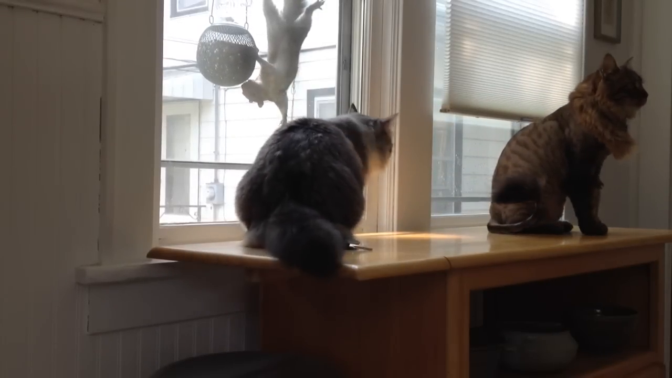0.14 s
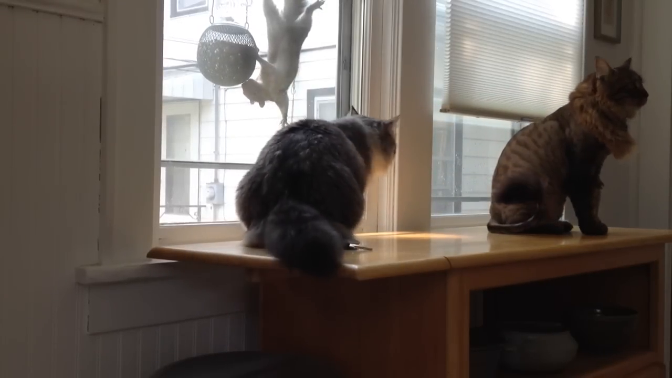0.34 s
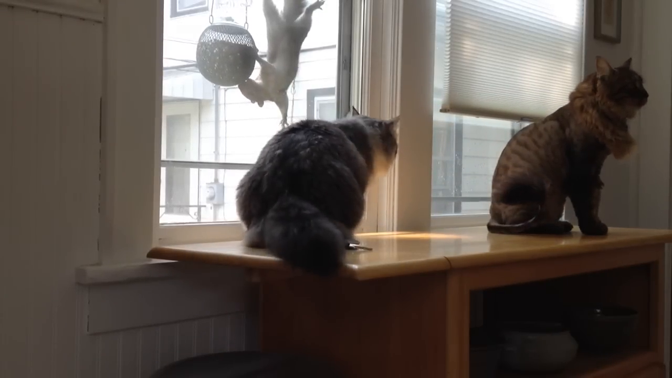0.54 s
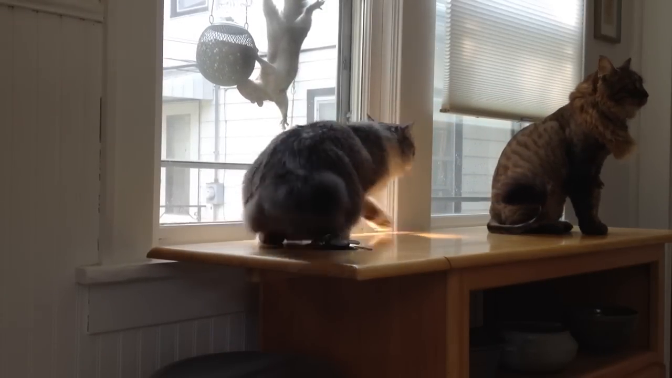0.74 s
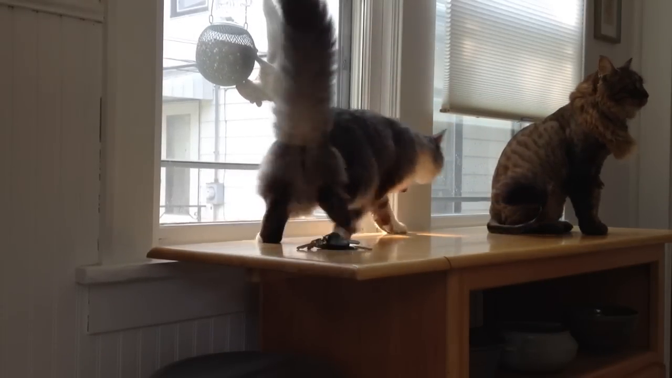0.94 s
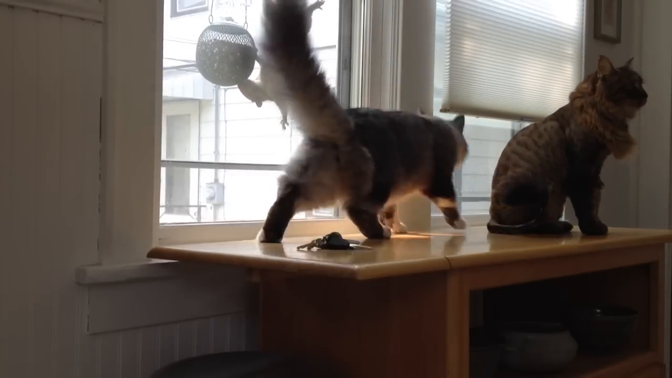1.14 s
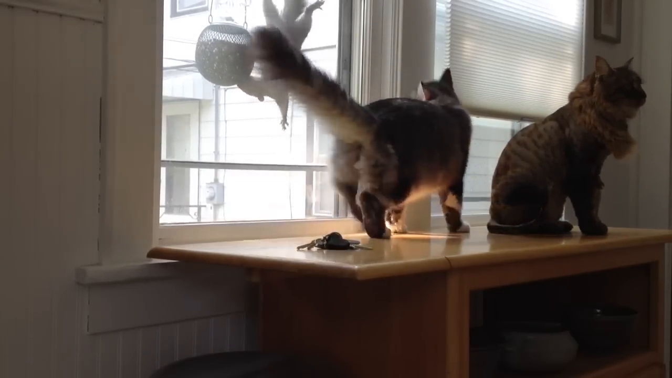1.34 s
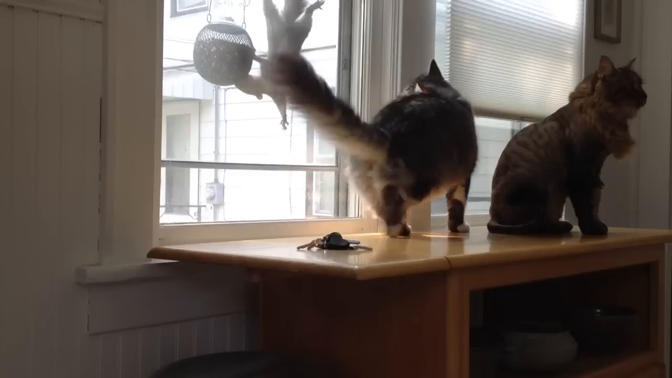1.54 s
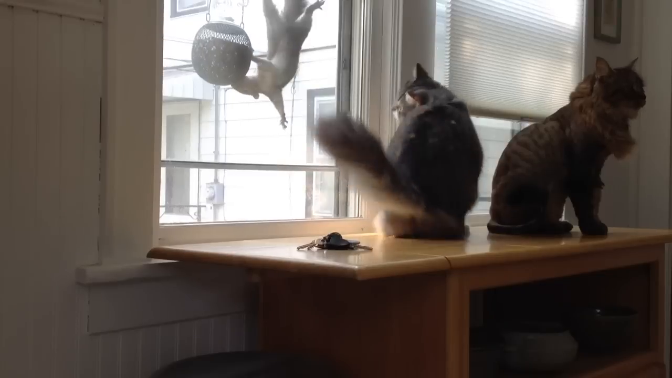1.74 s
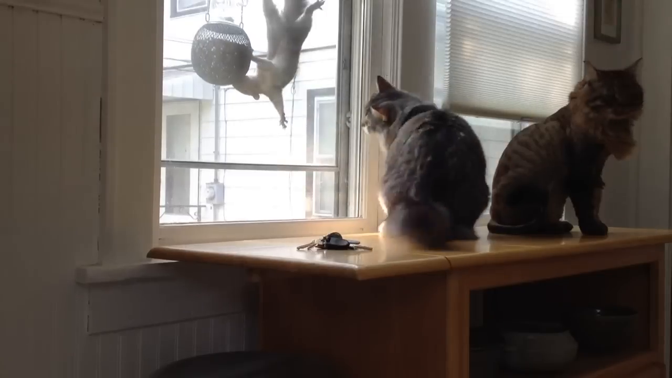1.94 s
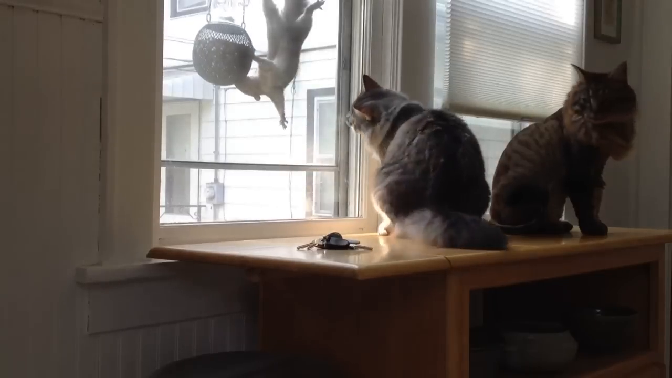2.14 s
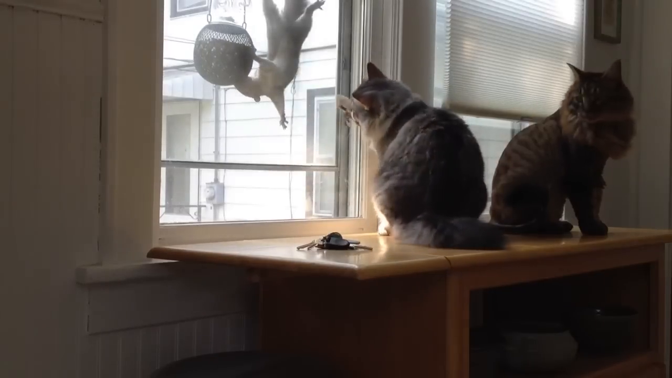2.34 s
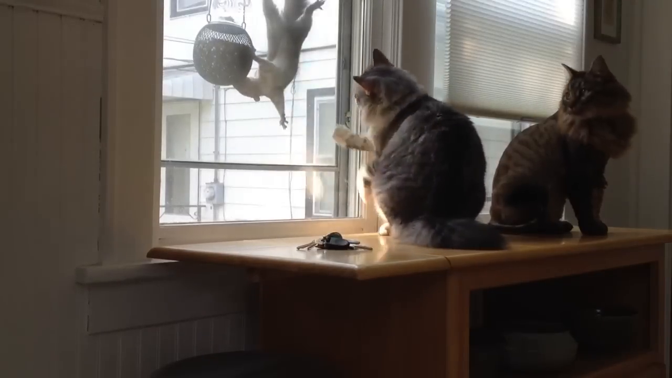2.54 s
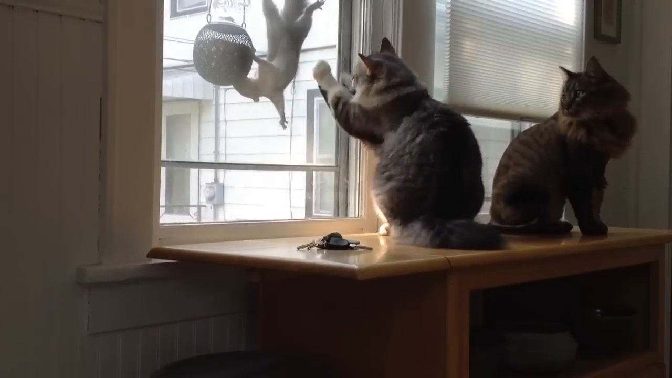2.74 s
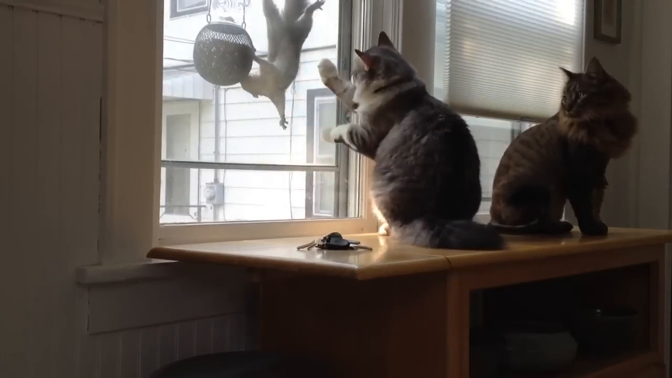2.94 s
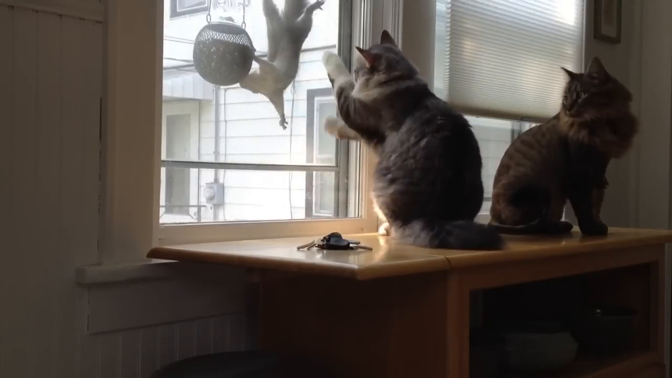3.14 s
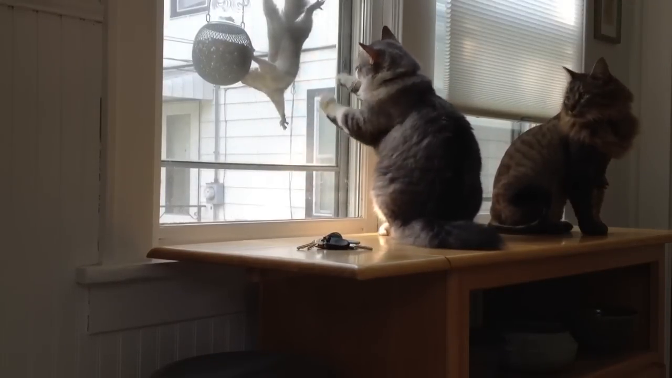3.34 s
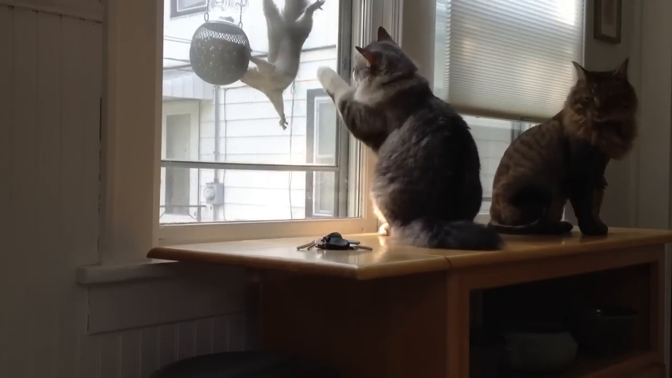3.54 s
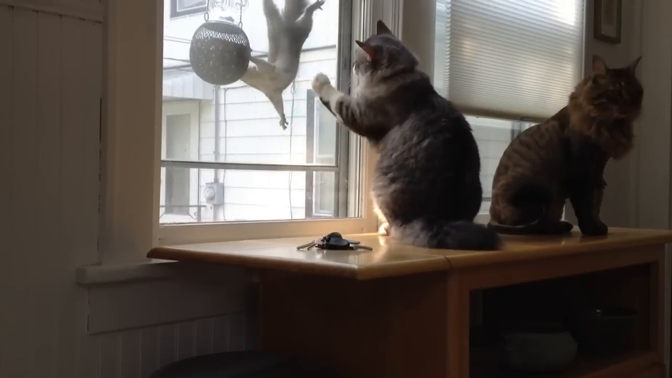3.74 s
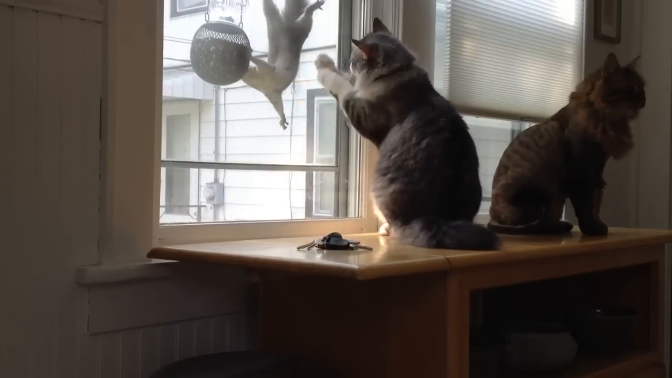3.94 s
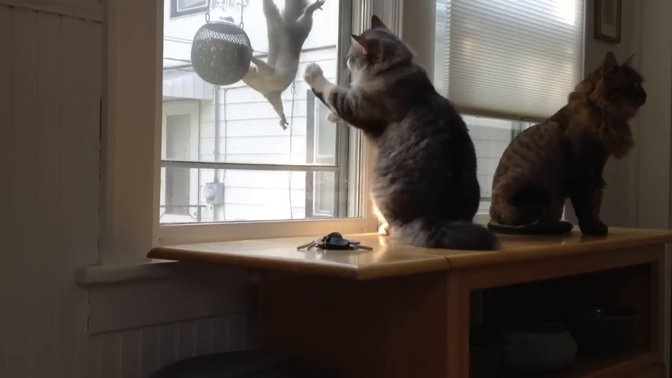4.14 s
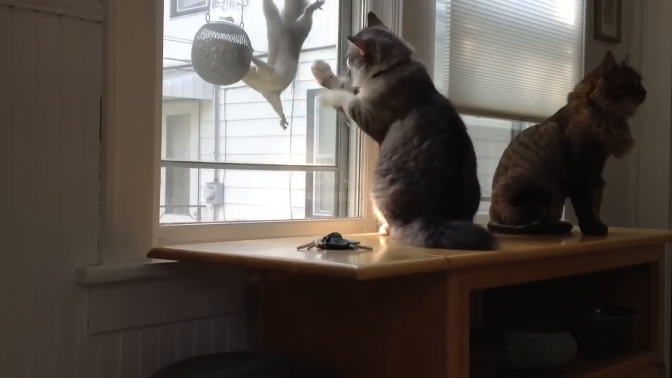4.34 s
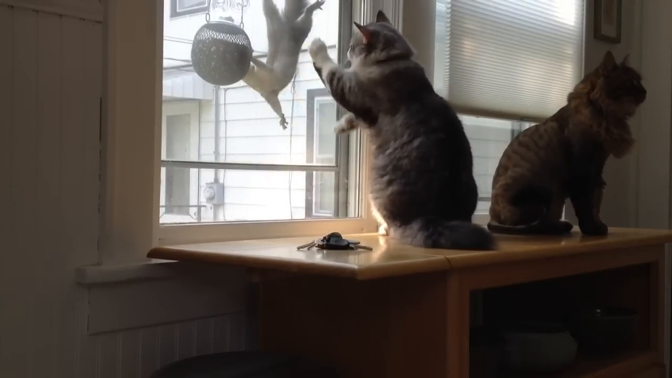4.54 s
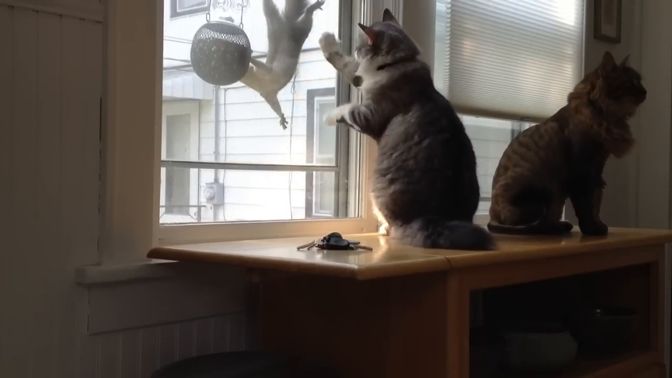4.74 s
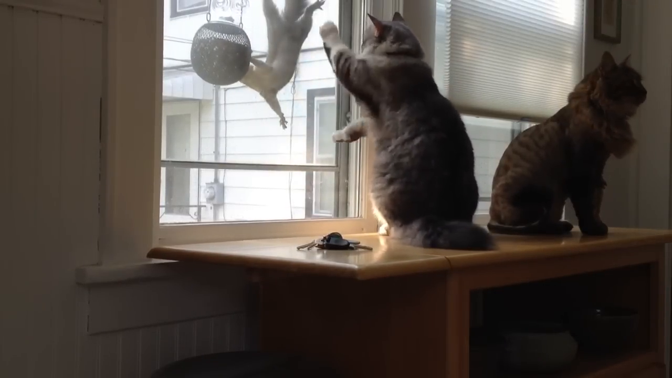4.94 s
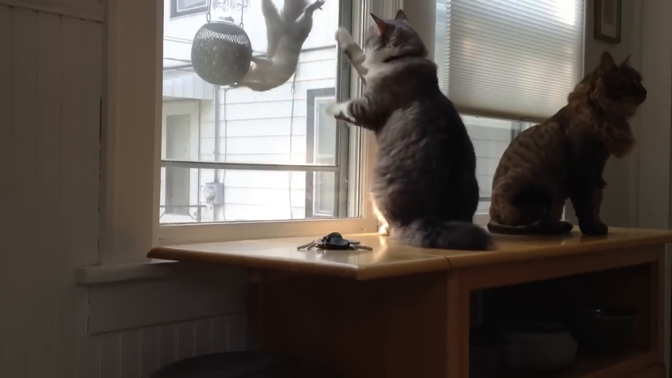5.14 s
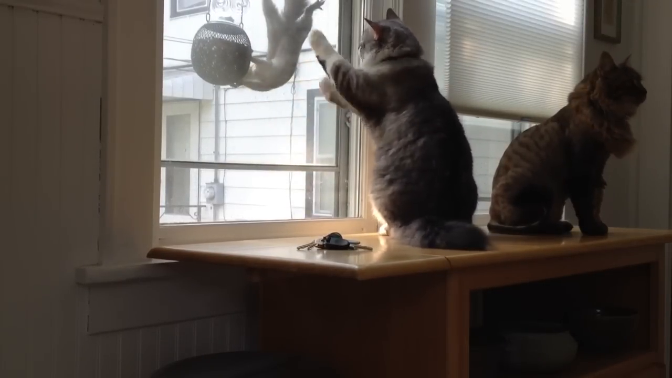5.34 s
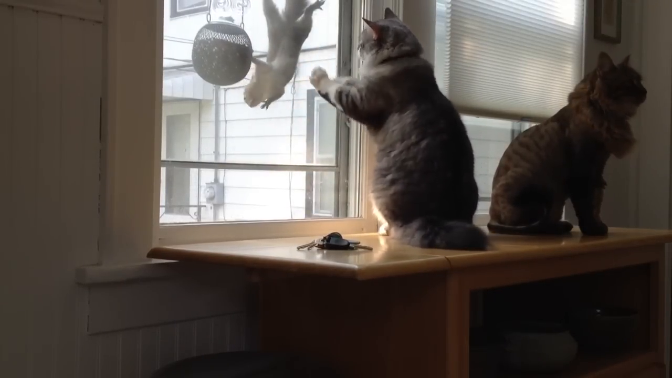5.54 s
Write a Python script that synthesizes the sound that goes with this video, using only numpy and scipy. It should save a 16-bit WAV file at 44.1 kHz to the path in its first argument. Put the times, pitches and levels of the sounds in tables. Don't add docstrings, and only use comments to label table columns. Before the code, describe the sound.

Low fridge hum in a small hard room, faint fur rustles, then irregular bright claw ticks and dull pats on a loose window.

```python
import sys
import numpy as np
from scipy import signal
from scipy.fft import rfft, irfft, next_fast_len
from scipy.io import wavfile
from scipy.ndimage import uniform_filter1d

SR = 44100
rng = np.random.default_rng(int(sys.argv[2]) if len(sys.argv) > 2 else 0)


def gain_from_decibels(decibels):
    exponent = np.asarray(decibels, float) / 20
    return 10 ** exponent


def inscribe(sig):
    pcm = np.round(np.clip(np.atleast_2d(sig).T, -1, 1) * 32767)
    wavfile.write(sys.argv[1], SR, pcm.astype(np.int16))


N = 246959
TIME = np.arange(N) / SR

# start in seconds, force in dB, edge burst in Hz,
# flatness in dB (a flat claw rings the pane more, ticks less), room share in dB.
CLAW_STRIKES = [(2.7585, -17, 6840, -1.5, 1), (3.2245, -23, 6700, -0.5, 7), (3.2292, -22.5, 7650, 0.5, 2.5),
                (3.473, -24.5, 7430, -10, 4.5), (3.4759, -26.5, 6850, 0, 6.5), (3.6653, -30, 6500, -1, 8),
                (3.929, -20, 6940, -0.5, 2.3), (3.9322, -27.5, 6950, 5, 5.5), (4.0799, -31, 6700, 4.5, 7.5),
                (4.3266, -20, 7300, 2, 4.5), (4.331, -26, 6400, 7, -10), (4.5275, -18.5, 7400, 0, 0.5),
                (4.5282, -17.5, 7150, -6.5, 5), (4.5336, -27.5, 6750, 0, 3.5),
                (4.7623, -19, 6760, 1.5, 4.5), (4.77, -35, 6200, -2, -11), (4.9033, -34, 7030, 2, 7),
                (4.9649, -34.5, 6720, 7, 8), (4.9738, -31, 6660, 5, 5), (5.2258, -14.5, 7030, 1, -0.5),
                (5.2307, -29.5, 6900, 10, 7), (5.393, -25, 6850, -3, 8), (5.402, -23, 6700, -3, -5)]
# start in seconds, force in dB, tick sharpness in dB, edge burst in Hz.
CLAW_GRAZES = [(2.4035, -68, 3, 6130), (2.508, -46, -13, 7010), (2.5296, -41.5, -8, 6750),
               (2.753, -57, -13, 7100), (2.8205, -45, -7, 6630), (2.9145, -43, -11, 7170),
               (3.068, -57, -12, 6840), (3.109, -52, -12, 6700), (3.1582, -41, -5, 6700),
               (3.257, -44, 1, 6220), (3.3382, -43.5, -3, 7640), (3.6567, -39.5, -16, 6690),
               (4.083, -44, -9, 6900), (4.0906, -40, -15, 6750), (4.1323, -37, -16, 6800),
               (4.2473, -48.5, -13, 6670), (4.915, -44, -4, 7400), (4.9225, -44, -6, 7190),
               (4.9669, -35, -20, 7250), (4.9944, -56, -21, 7090), (5.009, -46, -20, 6660),
               (5.1795, -54, -3, 6100), (5.3958, -41, -17, 6700), (5.417, -38, -9, 6690)]
# delay after it in seconds, level in dB.
EDGE_ECHOES = [(.0017, -13), (.0033, -11), (.0050, -15), (.0062, -16)]
# frequency in Hz, level in dB.
SCATTER_BODY = [(700, -22), (1500, -24), (2100, -15), (2600, -7.5), (3100, -6.5), (3800, -0.5),
                (4200, -0.5), (4700, 1.5), (5150, -10), (6000, -38)]
SCATTER_LOW_EDGE = [(4800, -22), (5400, -4.5), (6000, -4.5), (6500, 0.5), (7200, -22.5)]
SCATTER_EDGE = [(6000, -15.5), (6800, -3), (7600, 2), (8400, -8.5), (9500, -18), (11500, -10),
                (13500, -12.5), (15500, -39)]
# start in seconds, knock in dB, boom in dB, rap in dB.
PAD_THUMPS = [(1.119, -51, -59, -74), (1.589, -52, -72, -71), (2.756, -36.5, -44.5, -57.5),
              (2.908, -67, -58, -61), (3.224, -34.5, -42.5, -48.5), (3.259, -39, -46.5, -56),
              (3.474, -38.5, -46, -57), (3.672, -53, -52.5, -63), (3.932, -41, -45.5, -53.5),
              (3.963, -56, -49, -68), (4.087, -38, -54, -51.5), (4.325, -48, -51, -58),
              (4.527, -40.5, -41, -43.5), (4.56, -43, -43, -54), (4.761, -45.5, -47.5, -63),
              (4.966, -50, -50, -51), (5.225, -48, -53.5, -63), (5.298, -64, -50, -64),
              (5.396, -52, -49, -58)]
# frequency in Hz, level in dB, T60 in seconds.
SASH_BOOM = [(126.4, 0.5, 0.18), (179.6, 2.5, 0.2), (206, 3, 0.068), (263, -4, 0.51), (340.8, 8.5, 0.23)]
SASH_KNOCK = [(392.5, 4, 0.11), (433.5, 4, 0.072), (491.3, 4, 0.059), (540, -17, 0.06), (608, -1.5, 0.047)]
SASH_RAP = [(643.5, 5, 0.1), (708, 2.5, 0.087), (788.6, 1, 0.094), (907, 5, 0.079), (946, -2.5, 0.14),
            (1092, 0, 0.049), (1202, -9.5, 0.064), (1372, -2.5, 0.056), (1510, 0, 0.041),
            (1830, -17, 0.038), (1995, -7, 0.09)]
# loudest moment in seconds, level in dB, swell in seconds,
# fade in seconds, brightness in dB; swell and fade span 20 dB.
FUR_SLIDES = [(.06, -73, .08, 0.12, -2), (.24, -63, 0.22, 0.42, 4), (.62, -67.5, 0.19, 0.63, 3.5),
              (1.07, -73.5, 0.061, 0.12, 2), (1.26, -79.5, 0.23, .24, -3), (1.4, -62, 0.02, 0.11, 1),
              (1.59, -65.5, 0.028, 0.11, -21), (2.22, -76, .05, .04, -2), (2.51, -76, 0.064, 0.048, -5),
              (2.532, -72, 0.012, 0.066, 4), (2.6, -76, .1, 0.12, -3)]
# frequency in Hz, level in dB.
FUR_BODY = [(2500, -12), (3400, -4), (4600, -4), (5150, -8.5), (5700, -6), (7500, -6.5), (9500, -16),
            (11000, -41)]
FUR_SHEEN = [(8500, -36), (10500, -3), (12000, 1), (15500, -5)]
FUR_SCUFF = [(900, -32), (1600, -6), (2500, 1), (3300, -7), (4200, -43)]
# band centre in Hz, level in dB, T60 in seconds.
ROOM_BANDS = [(282, 3, 0.27), (606, 6.5, 0.38), (1240, 4, 0.46), (2280, 6.5, 0.36), (3100, 4, 0.41),
              (4360, 3, 0.39), (5600, 7.5, 0.38), (7100, 0, 0.46), (8900, 7.5, 0.33), (10800, -1.5, 0.34),
              (14000, 1, 0.27)]
# frequency in Hz, level in dB.
ROOM_BASS = [(90, -12), (170, -0.5)]
# time in seconds, blade tone in Hz.
FAN_DRIFT = [(0.0, 176.38), (0.47, 176.19), (0.93, 176.52), (1.4, 176.48), (1.87, 176.78), (2.33, 176.64),
             (2.8, 176.46), (3.27, 176.12), (3.73, 176.48), (4.2, 176.46), (4.67, 176.59), (5.13, 176.72),
             (5.6, 176.68)]
SHAFT_ORDERS = [2, 8, 9, 10, 11, 12, 13, 14, 15, 20, 27, 32, 42]
# level in dB rms, one per order.
SHAFT_LEVELS_DB = [-100, -73, -75, -92, -73.5, -72.5, -80, -79.5, -79.5, -77.5, -87, -84.5, -90]
# frequency in Hz, level in dB.
AIR_COLOUR = [(25, -40), (60, -28), (90, -28), (120, 1.5), (200, 0.5), (400, 2), (650, -1.5), (900, -6.5),
              (1300, -7), (1700, -10), (2100, -18.5), (2800, -42)]
# frequency in Hz, width in Hz, level in dB.
AIR_PEAKS = [(135, 34, 1.5), (302, 32, 1)]
# frequency in Hz, gain in dB.
PORT_RESPONSE = [(4000, 0), (4400, 1), (4750, 3), (4950, 0), (5150, -3), (5450, 0)]
# frequency in Hz, level in dB.
HISS_COLOUR = [(1200, -22), (1900, -3), (2500, -3.5), (3000, -5), (3600, -5.5), (4100, -7.5), (4650, -6.5),
               (5100, -11), (5500, -8.5), (6000, -10), (8000, -14), (9900, -22.5), (12000, -18),
               (14500, -14.5)]

PLACES = 3


def claws():
    ring_hz, ring_s, edge_s = 4300, 0.00034, 0.00028
    ring_delay_s, edge_delay_s = 0.00121, 0.0026
    direct, feed = np.zeros(N), np.zeros((PLACES, 3, N))
    table = contacts()
    chance = rng.random((len(table), 16))
    crackle_decay = np.exp(-TIME[:512] / 0.001)
    crackle_colour = [(1500, -3.0), (3000, 3.0), (13000, 5.5), (16000, -25.5)]
    for k, (row, c) in enumerate(zip(table, chance)):
        start_s, tick_db, ring_db, edge_db, edge_hz, wet_db = row
        add(direct, start_s, gain_from_decibels(tick_db - 3.5) * crackle_decay * coloured(crackle_colour, 512))

        tilt_db = 1.7 * (edge_hz - 6900) / 1000
        body_db = 0.5 * (ring_db + edge_db) + 3
        spot, i = feed[k % PLACES], int(start_s * SR)
        spot[:, i] = gain_from_decibels(wet_db + np.array([body_db, edge_db - tilt_db, edge_db + tilt_db]))
        bounce = i + 8 + int(24 * c[2])
        spot[:, bounce] = 0.22 * spot[:, i]

        s = start_s - 0.002
        tick = wavelet(11800, 0.00017, c[0]) + 0.84 * wavelet(7740, 0.00018, c[1])
        add(direct, s, gain_from_decibels(tick_db) * tick)
        first = wavelet(ring_hz * (0.88 + 0.29 * c[3]), ring_s, c[4])
        second = wavelet(ring_hz * (0.85 + 0.079 * c[5]), ring_s, c[6])
        add(direct, s + ring_delay_s, gain_from_decibels(ring_db) * first)
        add(direct, s + ring_delay_s + 0.0019, gain_from_decibels(ring_db - 3.5) * second)
        add(direct, s + edge_delay_s, gain_from_decibels(edge_db) * wavelet(edge_hz, edge_s, c[7]))
        for (lag_s, db), u, v in zip(EDGE_ECHOES, c[8:12], c[12:]):
            echo = wavelet(edge_hz * (0.89 + 0.25 * u), edge_s, v)
            add(direct, s + edge_delay_s + lag_s, gain_from_decibels(edge_db + db + 1.5 * (v - 0.5)) * echo)
    colours = (SCATTER_BODY, SCATTER_LOW_EDGE, SCATTER_EDGE)
    return direct, [sum(map(tint, spot, colours)) for spot in feed]


def contacts():
    rows = []
    for s, db, hz, flat_db, wet_db in CLAW_STRIKES:
        tick_db = db - 14.5 - 0.37 * max(flat_db, 0)
        rows.append((s, tick_db, db - 14.5 + flat_db, db, hz, wet_db))
    for s, db, sharp_db, hz in CLAW_GRAZES:
        wet_db = 7 - 0.14 * (db + 40)
        rows.append((s, db + sharp_db, db - 15, db, hz, wet_db))
    return rows


def wavelet(hz, length_s, turn):
    t = np.arange(-0.002, 0.002, 1 / SR)
    return np.exp(-0.5 * (t / length_s) ** 2) * np.cos(2 * np.pi * (hz * t + turn))


def pads():
    out = np.zeros(N)
    chance = rng.standard_normal((len(PAD_THUMPS), 21))
    for (s, knock_db, boom_db, rap_db), c in zip(PAD_THUMPS, chance):
        add(out, s, gain_from_decibels(boom_db - 5) * modes(SASH_BOOM, 0.0045, c[:5]))
        add(out, s, gain_from_decibels(knock_db - 7.0) * modes(SASH_KNOCK, 0.0054, c[5:10]))
        add(out, s, gain_from_decibels(rap_db - 6.5) * modes(SASH_RAP, 0.0016, c[10:]))
    return out


def modes(table, swell_s, chance):
    t = TIME[:SR // 2]
    ring = np.zeros(len(t))
    for (hz, db, t60_s), c in zip(table, chance):
        tone = np.sin(2 * np.pi * (hz * (1 + 0.031 * c) * t + 10 * c))
        ring += gain_from_decibels(db) * tone * 1000 ** (-t / t60_s)
    return ring * (1 - np.exp(-(t / swell_s) ** 2))


def fur():
    body, sheen, scuff = np.zeros((3, N))
    for s, db, swell_s, fade_s, bright_db in FUR_SLIDES:
        drop = np.where(TIME < s, (s - TIME) / swell_s, (TIME - s) / fade_s)
        slide = gain_from_decibels(db - 20 * drop)
        body += slide
        sheen += slide * gain_from_decibels(-10.5 + bright_db)
        scuff += slide * gain_from_decibels(-6 - 0.24 * bright_db)
    hiss = body * coloured(FUR_BODY, N)
    hiss += sheen * coloured(FUR_SHEEN, N)
    hiss += scuff * coloured(FUR_SCUFF, N)
    return gain_from_decibels(1.0 * walk(60.5)) * hiss


def room(rise_s):
    t = TIME[:int(SR * 3 / 4)]
    spectrum = rfft(rng.standard_normal(len(t)))
    log_hz = np.log(np.fft.rfftfreq(len(t), 1 / SR) + 1)
    centres = np.log(np.array(ROOM_BANDS)[:, 0])
    tail = np.zeros(len(t))
    for (hz, db, t60_s), one in zip(ROOM_BANDS, np.eye(len(ROOM_BANDS))):
        band = irfft(spectrum * np.interp(log_hz, centres, one), len(t))
        lumps_db = 1.8 * walk(112.0)[:len(t)]
        tail += gain_from_decibels(db + lumps_db) * band * 1000 ** (-t / t60_s)
    return tail * (1 - np.exp(-t / rise_s))


def fridge():
    shaft_hz, mains_hz, mains_lead_turns = 58.79, 359.85, 0.70
    turns = np.cumsum(np.interp(TIME, *np.transpose(FAN_DRIFT))) / SR
    fan = gain_from_decibels(-59.0 + 0.15 * walk(1.5)) * np.cos(2 * np.pi * turns)
    octave = gain_from_decibels(-60.0 + 0.43 * walk(2.4)) * np.cos(4 * np.pi * turns)
    mains = gain_from_decibels(-61.0) * np.cos(2 * np.pi * (mains_hz * TIME + mains_lead_turns))
    shaft = np.zeros(N)
    for order, db in zip(SHAFT_ORDERS, SHAFT_LEVELS_DB):
        line = np.cos(2 * np.pi * (order * shaft_hz * TIME + rng.random()))
        shaft += gain_from_decibels(db + 1.9 * walk(3.84)) * line
    bins_hz = np.fft.rfftfreq(N, 1 / SR)
    peaks_db = sum(db * np.exp(-0.5 * ((bins_hz - hz) / width_hz) ** 2) for hz, width_hz, db in AIR_PEAKS)
    air = irfft(rfft(coloured(AIR_COLOUR, N)) * gain_from_decibels(peaks_db), N)
    return np.sqrt(2) * (fan + octave + mains + shaft) + gain_from_decibels(-59.5 + 0.22 * walk(2.15)) * air


def coloured(points, size):
    y = tint(rng.standard_normal(size), points)
    return y / np.std(y)


def tint(x, points):
    size = next_fast_len(len(x))
    hz, db = np.transpose(points)
    bins_hz = np.fft.rfftfreq(size, 1 / SR) + 1
    gain = gain_from_decibels(np.interp(np.log(bins_hz), np.log(hz), db))
    return irfft(rfft(x, size) * gain, size)[:len(x)]


def walk(rate_hz):
    k = int(SR / rate_hz)
    steps = np.repeat(rng.standard_normal(N // k + 1), k)
    return 0.91 * uniform_filter1d(uniform_filter1d(steps, k), k)[:N]


def add(out, start_s, burst):
    i = int(start_s * SR)
    out[i:i + len(burst)] += burst[:len(out) - i]


def scene():
    direct, spots = claws()
    thumps = pads()
    thump_feed = gain_from_decibels(-37.5) * tint(thumps, ROOM_BASS)
    tail = np.zeros(N)
    for spot in spots:
        feed = gain_from_decibels(-24) * spot + thump_feed
        tail += signal.fftconvolve(feed, room(rise_s=0.00035))[:N]
    return (direct + thumps + tail + fur() + fridge())[None]


def band_limit(x):
    return signal.sosfilt(signal.butter(12, 16420, fs=SR, output="sos"), x)


def record(dry):
    low_cut_hz, top_hz = 124, 15330
    low_cut = signal.butter(4, low_cut_hz, "high", fs=SR, output="sos")
    heard = signal.sosfilt(low_cut, tint(dry[0], PORT_RESPONSE))
    hiss = gain_from_decibels(-68.5) * coloured(HISS_COLOUR, N)
    rumble = gain_from_decibels(-89.5) * coloured([(20, -7), (90, 11), (150, -28)], N)
    heard = heard + hiss + rumble
    below = tint(heard, [(top_hz, 0), (top_hz + 100, -60)])
    attack = np.clip(uniform_filter1d(np.abs(heard), size=128) / gain_from_decibels(-36), 0, 1) ** 4
    mix = below + gain_from_decibels(-12) * attack * (heard - below)
    return band_limit(mix[None])


dry = scene()
out = record(dry)
inscribe(out)
```